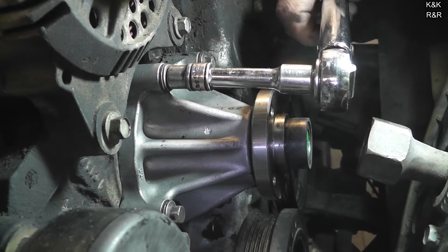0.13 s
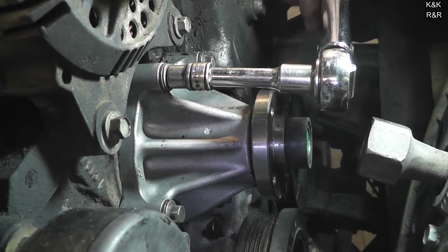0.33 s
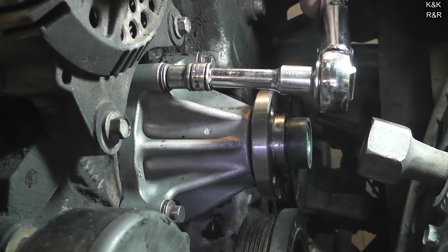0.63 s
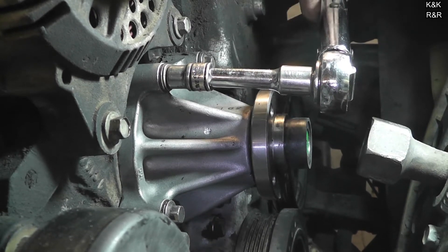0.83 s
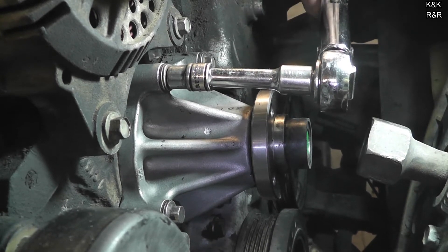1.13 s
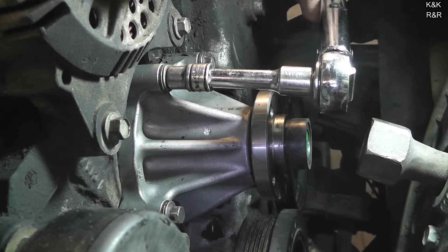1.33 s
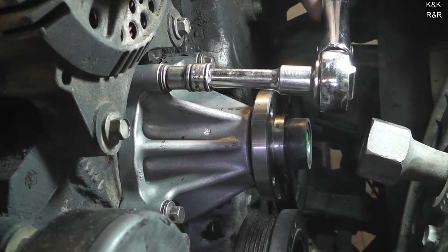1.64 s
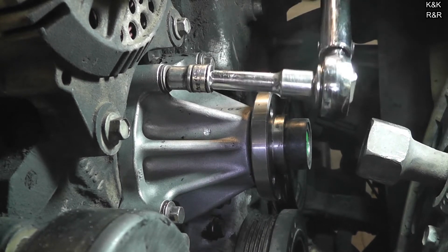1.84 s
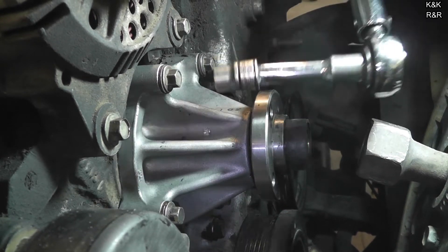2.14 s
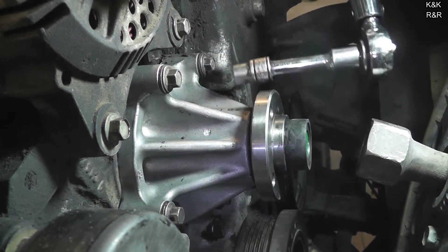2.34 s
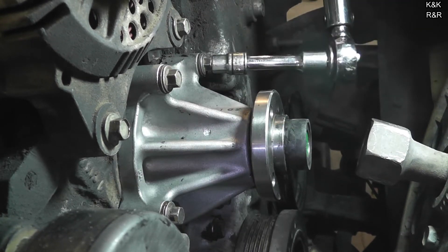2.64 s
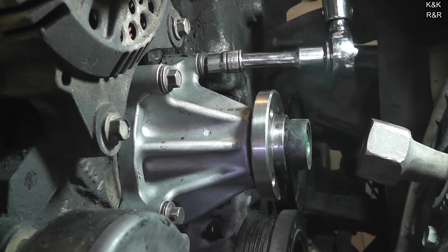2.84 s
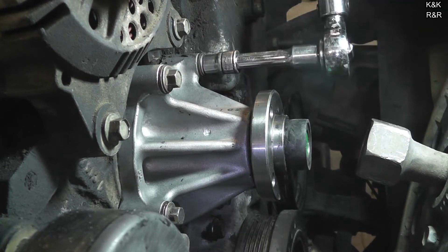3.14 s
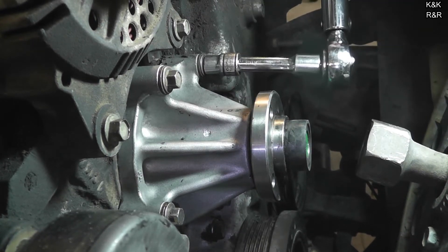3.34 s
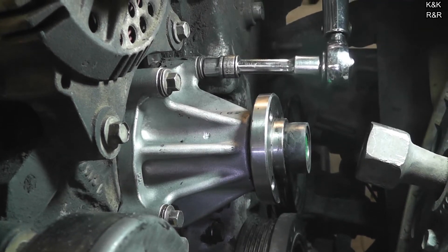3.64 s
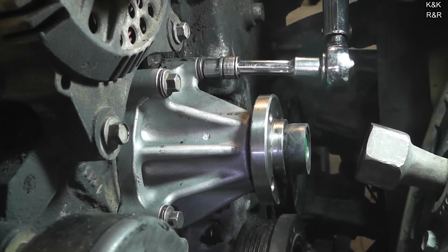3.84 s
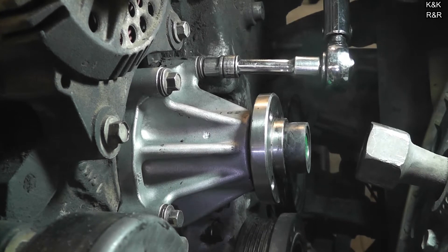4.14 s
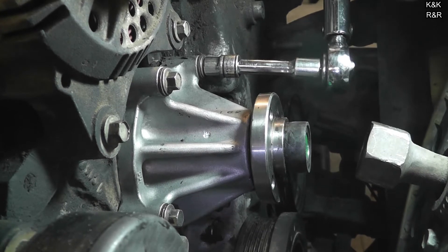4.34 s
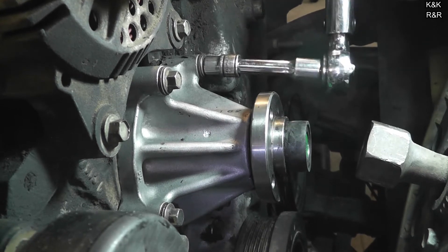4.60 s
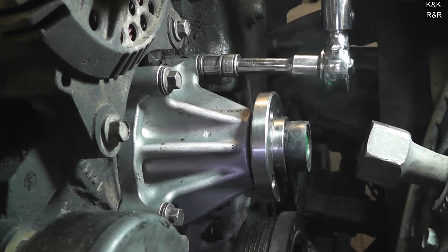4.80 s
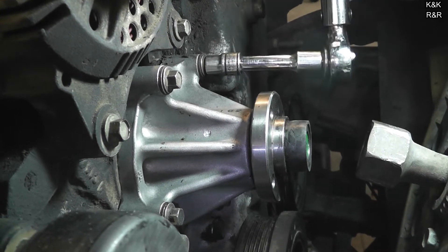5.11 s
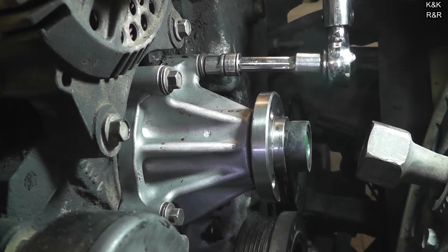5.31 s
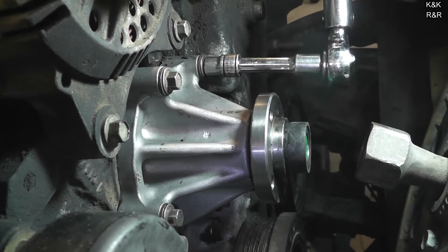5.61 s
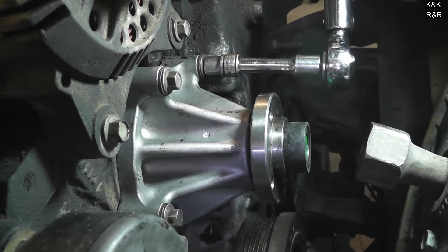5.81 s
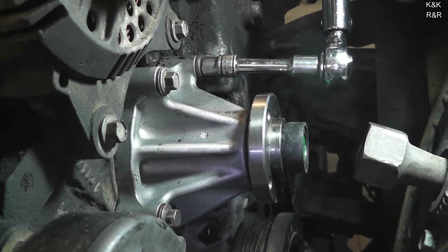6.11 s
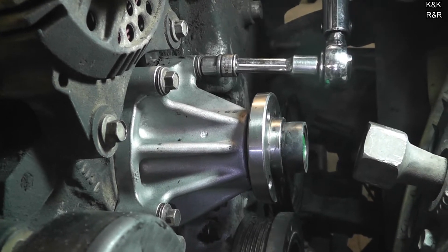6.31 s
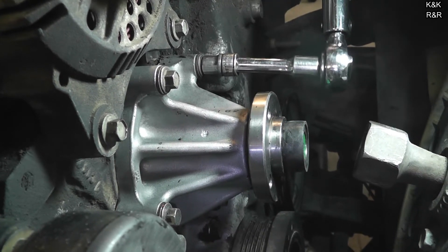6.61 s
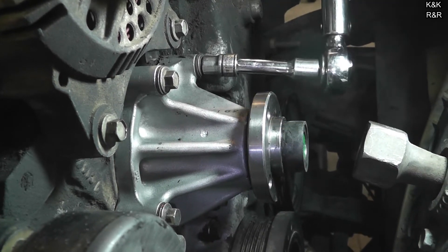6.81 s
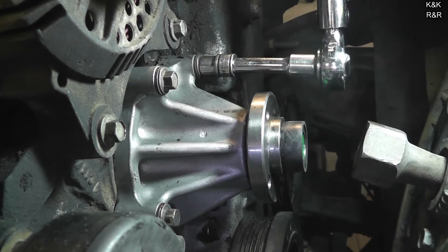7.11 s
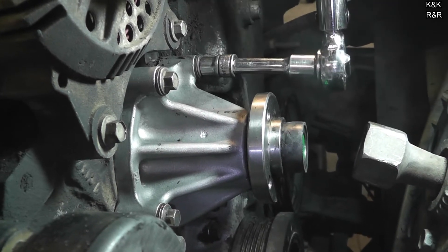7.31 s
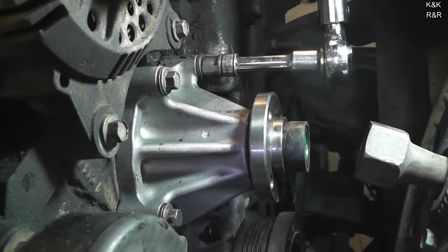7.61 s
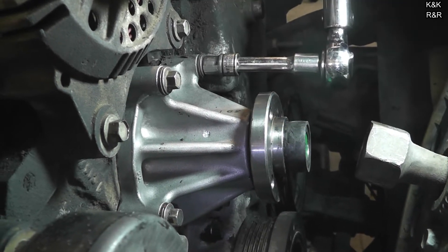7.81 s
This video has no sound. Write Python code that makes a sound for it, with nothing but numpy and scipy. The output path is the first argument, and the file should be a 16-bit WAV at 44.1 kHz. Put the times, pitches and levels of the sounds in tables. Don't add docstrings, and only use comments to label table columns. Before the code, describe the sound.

In a quiet garage, close to a stereo microphone, a socket wrench works on engine bolts. Dull hand bumps and light socket taps come first, then a crisp snap, a loud steel strike with a brief bright ring, and scattered clinks. After soft rustling and fumbling, hard ratchet clicks sound, then a heavy low clunk, two more sharp clicks and a final tap. Cloth rustle runs throughout.

```python
import sys
import numpy as np
from scipy import signal
from scipy.fft import rfft, irfft
from scipy.io import wavfile

SR = 44100
rng = np.random.default_rng(int(sys.argv[2]) if len(sys.argv) > 2 else 0)


def gain_from_db(level_db):
    decades = np.asarray(level_db, float) / 20
    return 10 ** decades


def to_wav(sig):
    pcm = np.clip(np.atleast_2d(sig), -1, 1) * 32767
    pcm = np.round(pcm).astype(np.int16)
    wavfile.write(sys.argv[1], SR, pcm.T)


N = 350595

# (frequency [Hz], density [dB per Hz])
AIR_SPECTRUM = [(20, -32.5), (120, 1.5), (200, -8), (280, -8.5), (800, -14), (1900, -30.5), (2400, -33.5),
                (3500, -34.5), (4200, -24.5), (5100, -30), (5500, -22), (6000, -30), (9000, -45.5),
                (15600, -52)]
# (frequency [Hz], level [dB rms])
WHINE_LINES = [(120, -67), (2000, -77.5)]
# (frequency [Hz], density [dB per Hz])
RUMBLE_SPECTRUM = [(120, -12), (270, 3), (500, -2.5), (900, -2), (1400, -8), (1900, -16), (2400, -38)]
# (frequency [Hz], density [dB per Hz])
SLEEVE_SPECTRUM = [(880, -17.5), (1500, -4.5), (1650, -12), (2070, -6), (2290, -14.5), (2730, -10),
                   (3520, -6), (4540, -2.5), (7120, -4), (8920, 0.5), (15600, -17)]
# (frequency [Hz], side minus mid [dB])
STEREO_SPREAD = [(60, 0.5), (110, -10), (200, -2.5), (380, -4.5), (700, -6.5), (1290, -6), (2380, -12),
                 (4400, -16), (8120, -21), (15000, 2.5)]
# (peak time [s], rise [s per 10 dB], fall [s per 10 dB], sleeve hiss [dB], hand rumble [dB])
ARM_SWEEPS = [(.25, 0.24, 0.02, -53.5, -54), (.52, 0.4, 0.01, -57.5, -51), (1.03, 0.07, 0.01, -56.5, -55),
              (1.88, 0.15, 0.18, -53, -51.5), (2.155, 0.09, 0.21, -55.5, -48),
              (2.918, 0.02, 0.85, -61, -54), (4.462, 0.29, 0.2, -55, -57), (5.01, 0.05, 0.08, -49, -44),
              (5.579, 0.02, 0.37, -58, -51), (6.148, 0.06, 0.2, -51, -51.5),
              (6.49, 0.0737, 0.0557, -47, -38), (6.64, 0.13, 0.1, -54.5, -50),
              (6.85, 0.12, 0.01, -54.5, -48.5), (7.427, 0.1, 0.07, -51, -45)]
# (start time [s], hold [s], sleeve hiss [dB], hand rumble [dB])
QUICK_BRUSHES = [(0, 0.085, -65.5, -56), (0.684, 0.055, -64, -56), (1.222, 0.024, -59, -59),
                 (1.446, 0.056, -61, -50), (1.513, 0.084, -67, -64), (2.308, 0.093, -68, -58.5),
                 (2.701, 0.015, -59.5, -50), (3.172, 0.23, -53, -51.5), (3.5, 0.032, -59, -51.5),
                 (3.626, 0.041, -55, -56.5), (3.748, 0.079, -54, -46.5), (3.93, 0.037, -54.5, -46.5),
                 (4.05, 0.014, -54.5, -54), (4.214, 0.025, -57.5, -46), (4.702, 0.059, -55.5, -77),
                 (5.178, 0.029, -58, -54), (5.27, 0.065, -57.5, -56), (5.398, 0.048, -59.5, -56),
                 (5.748, 0.058, -54.5, -57), (5.907, 0.012, -52, -51), (6.576, 0.078, -59, -50),
                 (6.902, 0.041, -58, -51.5), (6.978, 0.059, -62, -54.5), (7.084, 0.16, -58.5, -55.5),
                 (7.332, 0.012, -53.5, -52), (7.585, 0.06, -63.5, -52.5), (7.705, 0.025, -57, -54),
                 (7.785, 0.15, -65, -51)]

# (frequency [Hz], width [Hz], level [dB])
BRACKET_MODES = [(77.6, 13, -8), (159.3, 7, 2.5), (185, 8, 2.5), (259, 12, 4), (277, 5, 5), (291, 12, 4),
                 (341, 35, 3.5), (434, 29, 7), (480, 53, 4.5), (660, 36, 0.5), (850, 84, -4.5),
                 (1210, 46, -2.5), (1340, 58, -1.5), (1640, 46, -12)]
# (time [s], peak [dB], main frequency [Hz], t60
# [s])
SOFT_KNOCKS = [(0.677, -31.5, 806, 0.041), (0.974, -32.5, 770, 0.18), (1.244, -47, 760, 0.068),
               (1.2655, -34.5, 790, 0.1), (1.42, -43, 1500, .03), (1.433, -31.5, 740, 0.062),
               (2.135, -36, 603, 0.08), (2.15, -34.5, 1040, 0.091), (2.167, -37, 503, .06),
               (2.516, -35, 1460, 0.062), (2.698, -43, 1270, .04), (2.915, -41, 850, 0.052),
               (2.972, -40.5, 1300, 0.033), (6.602, -31.5, 195, 0.26), (4.636, -41, 1300, .04),
               (4.87, -45, 1190, .053), (4.959, -43.5, 1230, 0.028), (4.981, -33.5, 1100, 0.031),
               (4.998, -39, 1210, 0.037), (5.918, -36, 1360, 0.049), (6.078, -34.5, 960, 0.064),
               (6.426, -35, 1000, .03), (6.431, -30, 527, 0.074), (6.599, -24.5, 630, 0.051),
               (6.648, -35, 541, 0.15), (7.537, -41, 750, 0.024), (7.606, -41.5, 740, .03),
               (7.628, -48, 1100, .025), (7.648, -36, 740, 0.047), (7.744, -38, 700, .025),
               (7.758, -36.5, 810, 0.035), (7.79, -32.5, 815, 0.02), (7.874, -28, 780, 0.063),
               (0.078, -29.5, 448, 0.14), (0.469, -39, 322, 0.075), (0.938, -32.5, 450, 0.17),
                (0.984, -27.5, 195, 0.07), (1.009, -33, 420, 0.031), (1.433, -33, 480, 0.045),
                (1.504, -39.5, 264, 0.096), (2.087, -42, 204, .06), (2.149, -37.5, 152, 0.09),
                (2.334, -40, 174, 0.04), (6.432, -35, 224, 0.063), (3.791, -37, 288, 0.038),
                (3.863, -37, 287, 0.074), (3.984, -39.5, 150, 0.049), (4.162, -40, 165, 0.058),
                (4.215, -33, 263, 0.04), (4.263, -36.5, 274, 0.059), (4.324, -37, 160, .039),
                (4.392, -36, 370, 0.039), (4.481, -36.5, 328, 0.078), (6.478, -44, 277, .11),
                (6.537, -24.5, 298, 0.053), (6.578, -34, 250, 0.054), (7.393, -46, 164, .062),
                (7.916, -30.5, 586, 0.082), (7.922, -28.5, 435, 0.061), (7.938, -33.5, 480, .06)]
# (frequency [Hz], width [Hz], level [dB])
CASTING_MODES = [(168, 16, 0.5), (276, 15, 5.5), (356, 7.1, -18), (446.5, 27, 1.5), (653, 19, -9),
                 (857, 5.7, 3.5), (1210, 8.9, -10), (1424, 14, -7.5), (1680, 88, -13.5)]

# (frequency [Hz], level [dB], t60 [s])
BOLT_MODES = [(756, -1, .1), (820, -2.5, 0.13), (1863, -8.5, 0.078)]
# (time [s], peak [dB])
BOLT_HUM_EVENTS = [
    (.679, -41),
    (.976, -39),
    (1.245, -45.5),
    (1.267, -41),
    (1.434, -36.5),
]
# (frequency [Hz], peak [dB], t60 [s], left minus right [dB], left lead [rad])
FREE_SOCKET_MODES = [(1520, -41, .14, -2, 1), (8974, -43.5, .15, -8, 0), (12090, -28.5, .17, -2, 2.5),
                     (12870, -25.5, .16, -4, .7)]

# (time [s], left level [dB], right lag [ms], right level [dB])
OVERLOAD_KICKS = [
    (1.9095, -23.5, -.4, -30.5),
    (2.1893, -8.5, 1.2, -12),
    (4.5654, -12, -.3, -24),
    (4.5672, -16, .1, -10),
    (4.6622, -11.5, 1.1, -18.5),
    (4.7542, -13.5, 0, -12),
    (7.0487, -12, -.4, -10.5),
    (7.1837, -12, .2, -13),
]

SEAT_HITS = [
    (0.0794, -71.5, 13, -6),
    (0.6784, -57, 6.5, -22),
    (1.2443, -62.5, 7.5, -18),
    (1.2666, -54, 5, -29),
    (4.2333, -57, -4, -22),
    (4.8728, -66.5, 3, -18),
    (4.9823, -56, 0.5, -15),
    (5.919, -58, 4.5, -5),
    (6.0806, -63.5, 8, -17),
    (6.5989, -63, 12, -10),
]
SEAT_MODES = [(1850, 150, 2), (2550, 58, 2.5), (2870, 110, -4), (3700, 260, 4.5), (5260, 190, 3.5),
              (6900, 200, -1), (8230, 310, 1), (9650, 400, -5), (11000, 210, -26), (14200, 310, -37)]
BOLT_TAPS = [
    (0.9762, -41.5, 2.5, -30),
    (1.4331, -33.5, -2, -26),
    (6.4802, -42, 1, -19),
    (6.5062, -43, 9, -9),
]
BOLT_TAP_MODES = [(1810, 120, -9), (2800, 88, -7), (3080, 110, -10), (3750, 210, -1.5), (4030, 110, -1.5),
                  (4520, 120, -1.5), (5570, 87, -10), (6340, 340, -9), (8190, 240, 3), (8300, 144, 4.5),
                  (8770, 300, -0.5), (10200, 460, -7), (12400, 600, -24)]
RIM_HITS = [
    (7.8752, -40.5, 4.1, -21),
]
RIM_MODES = [(2050, 140, -7), (3280, 270, 0.5), (3870, 220, -1), (4240, 250, 5.5), (4900, 350, -0.5),
             (5200, 230, -2), (6600, 450, -12), (8300, 350, 1), (9300, 600, -13), (10700, 550, -19),
             (12600, 500, -18)]
HOUSING_CLINKS = [
    (2.5099, -38.5, -5.5, -14),
    (2.5166, -38, -2.5, -10),
    (2.6988, -44.5, -2.5, -8),
    (2.9181, -41, -3, -18),
    (2.972, -55.5, -6, -20),
]
HOUSING_CLINK_MODES = [(1300, 250, -8), (1810, 260, -3.5), (3000, 350, -9), (4080, 320, -1),
                       (4650, 430, -5), (5600, 220, -2), (6460, 500, -2), (7300, 500, -1.5),
                       (8000, 590, -2), (9950, 420, 1.5), (10500, 400, -3.5), (11200, 400, -5),
                       (14100, 900, -14)]
LIFTED_HITS = [
    (2.1871, -24, -7, -9.5),
]
LIFTED_MODES = [(1530, 140, -6), (3950, 250, -4.5), (4450, 250, -5), (4950, 250, 2.5), (5640, 200, -8),
                (6120, 300, -3), (7000, 450, -0.5), (7600, 300, -2.5), (9700, 530, -1.5), (10100, 200, -6),
                (10700, 350, -2.5), (14000, 500, -11)]
HEAD_SNAPS = [(1.7824, -46, -12, -4.5), (1.8925, -38, -13.5, -46), (1.9045, -41.5, -23, -4),
              (1.9061, -32, -24, 0), (1.9104, -34, -21, -14), (1.9107, -36, -21, -15),
              (3.6376, -56, -19, -10), (3.939, -60.5, 1, -23), (4.0741, -52.5, -25, -1),
              (4.4582, -51.5, -13, -14), (4.741, -56, -10, -14), (6.695, -45.5, -15, -22),
              (6.855, -59.5, -6, -17)]
HEAD_MODES = [(3200, 350, -21.5), (4500, 390, -24), (5550, 300, -15), (6540, 300, -7), (7200, 350, -8.5),
              (8400, 300, -9), (8910, 150, -2), (9500, 200, 0.5), (10160, 300, -4.5), (10770, 250, -7),
              (11430, 300, -7.5), (12760, 400, -12), (13800, 800, -21)]
SLACK_DROPS = [
    (4.5636, -23, -16.5, -12),
    (4.6599, -25, -17.5, -13),
]
SLACK_MODES = [(750, 300, -11.5), (1380, 300, -17), (3310, 280, -15.5), (4210, 130, -10), (4970, 300, -14),
               (5830, 250, -9), (6420, 270, -7.5), (6960, 187, -13), (7970, 280, -7), (8530, 460, -17.5),
               (10020, 350, 1), (10720, 250, -7.5), (11950, 340, -13), (14400, 900, -19.5)]
LOADED_DROPS = [
    (4.7519, -26, -13, -12),
    (7.045, -24, -17.5, -10),
]
LOADED_MODES = [(750, 380, -15), (1990, 250, -26), (3150, 270, -14), (4300, 630, -13), (5170, 300, -15.5),
                (6240, 250, -7.5), (6750, 280, -1.5), (7470, 180, -11.5), (8350, 300, -6),
                (9730, 260, -6.5), (10550, 300, -2), (11100, 260, -8), (12000, 400, -12),
                (14000, 1200, -16.5)]
BINDING_DROP = [
    (7.1806, -25.5, -13, -9),
]
BINDING_MODES = [(900, 500, -20.5), (1500, 270, -21), (3180, 240, -13.5), (4200, 400, -12),
                 (5060, 300, -21), (6320, 300, -10), (6860, 300, -9), (7560, 300, -13.5), (8400, 300, -10),
                 (9650, 250, -9), (10350, 280, 0), (10950, 250, -3), (12400, 600, -18), (14000, 1200, -19)]

AIR_DB, REST_SLEEVE_DB, REST_HAND_DB = -56.5, -72, -61
RUMBLE_CUT_HZ, HISS_TOP_HZ = 37, 15750
BRUSH_RISE_S, BRUSH_FALL_S = 0.019, 0.029
FOLD_DB, FOLD_LOW_HZ, FOLD_HIGH_HZ = 1.5, 6200, 10200
DUCK_ABOVE_DB, DUCK_DB = -30, 4
DUCK_ATTACK_S, DUCK_RELEASE_S = 0.03, 0.24
CLUNK_S, CLUNK_DB = 6.5055, -10.5
CENTRE_HZ, PAN_DB_PER_OCTAVE = 700, 3
BLOW_S = 0.84
CLINK_S = 2.188
WIDEN = 0.62
TAIL_SHRINK_PER_DB = 0.0736


def rms_one(x):
    return x / np.sqrt(np.mean(x ** 2) + 1e-20)


def at_hz(points, hz):
    point_hz, point_db = np.array(points)[:, 0], np.array(points)[:, 1]
    return np.interp(np.log(hz + 1), np.log(point_hz + 1), point_db)


def band(x, low_hz, high_hz, order=2):
    return signal.sosfilt(signal.butter(order, [low_hz, high_hz], "band", fs=SR, output="sos"), x)


def resonate(x, peaks, order=1):
    out = 0
    for k, (hz, width, db) in enumerate(peaks):
        r = np.exp(-np.pi * width * order / SR)
        zeros = [(1 - r * r) / 2, 0, (r * r - 1) / 2]
        poles = [1, -2 * r * np.cos(2 * np.pi * hz / SR), r * r]
        out = out + (-1) ** k * gain_from_db(db) * signal.sosfilt([zeros + poles] * order, x)
    return out


def to_stereo(mid, side):
    hz = np.fft.rfftfreq(side.shape[-1], 1 / SR)
    side = irfft(rfft(side) * gain_from_db(at_hz(STEREO_SPREAD, hz)), side.shape[-1])
    return np.array([mid + side, mid - side])


def add(out, s, piece):
    i = int(s * SR)
    out[:, i:i + piece.shape[1]] += piece[:, :N - i]


def drift(rate_hz):
    r = np.exp(-2 * np.pi * rate_hz / SR)
    wander = signal.lfilter([1], [1, -2 * r, r * r], rng.standard_normal(N + SR))
    return rms_one(wander[SR:])


def coloured(spectrum, grain_db):
    hz = np.fft.rfftfreq(N, 1 / SR)
    white = rng.standard_normal((2, N)) * gain_from_db(grain_db * rng.exponential(1, (2, N)))
    mid, side = irfft(rfft(white) * gain_from_db(at_hz(spectrum, hz)) * (hz < HISS_TOP_HZ), N)
    return to_stereo(mid, side) / np.std(mid)


def garage_air():
    t = np.arange(N) / SR
    lines = 0
    for hz, db in WHINE_LINES:
        lines = lines + gain_from_db(db + 55.5) * np.sin(2 * np.pi * hz * t + 0.63 * drift(3.2))
    return gain_from_db(AIR_DB) * (band(coloured(AIR_SPECTRUM, grain_db=1.0), RUMBLE_CUT_HZ, 20000) + lines)


def movements():
    t = np.arange(0, N, 32) / SR
    power = gain_from_db([[2 * REST_SLEEVE_DB], [2 * REST_HAND_DB]])
    strokes = [(s, 0, *rest) for s, *rest in ARM_SWEEPS]
    strokes += [(s, hold, BRUSH_RISE_S, BRUSH_FALL_S, *levels) for s, hold, *levels in QUICK_BRUSHES]
    for s, hold, rise, fall, *levels in strokes:
        distance = np.maximum((s - t) / rise, (t - s - hold) / fall)
        loss_db = 10 * np.maximum(distance, 0) ** 1.17
        power = power + gain_from_db(np.c_[levels] - loss_db) ** 2
    return [np.interp(np.arange(N) / SR, t, np.sqrt(p)) for p in power]


def hand_rumble(level):
    return level * gain_from_db(-4.5 + 2 * drift(13.0)) * coloured(RUMBLE_SPECTRUM, grain_db=2)


def folds(x):
    low, high = band(x, 300, FOLD_LOW_HZ), band(x, FOLD_HIGH_HZ, 18000)
    return sum(gain_from_db(FOLD_DB * drift(3.7)) * part for part in (low, x - low - high, high))


def sleeve_rustle(level):
    flicker_db = 1.4 * drift(35) + 1.6 * drift(8.2)
    return level * gain_from_db(flicker_db) * folds(coloured(SLEEVE_SPECTRUM, grain_db=2.5))


def ducking():
    teeth = SLACK_DROPS + LOADED_DROPS + BINDING_DROP
    loud_s = [s for s, db, *_ in teeth if db > DUCK_ABOVE_DB]
    after = np.maximum(np.arange(N) / SR - np.c_[loud_s], 0)
    dips = (1 - np.exp(-after / DUCK_ATTACK_S)) * np.exp(-after / DUCK_RELEASE_S)
    return gain_from_db(-DUCK_DB * np.sum(dips, axis=0))


def background():
    sleeve_level, hand_level = movements()
    return ducking() * (garage_air() + hand_rumble(hand_level) + sleeve_rustle(sleeve_level))


def handle_clunk(press_ms, wide):
    out, t = np.zeros((2, N)), np.arange(SR // 2) / SR
    press = np.minimum(t / 0.00079, 1) * np.exp(-(t * 1000 / press_ms) ** 3)
    grind = press * rng.standard_normal((2, len(t)))
    grind[:, 40] += 11.0
    mid, side = band(resonate(grind, BRACKET_MODES), 50, 2900, order=3)
    pair = np.array([0.82 * mid + wide * side, 1.15 * mid - wide * side])
    add(out, CLUNK_S, gain_from_db(CLUNK_DB) / np.abs(mid).max() * pair)
    return out


def knocks():
    out, t = np.zeros((2, N)), np.arange(12000) / SR
    for s, db, hz, t60 in SOFT_KNOCKS:
        noise = rng.standard_normal((2, len(t)))
        noise[0, 50] += BLOW_S / t60
        fade = np.minimum(t / 0.0013, 1) * gain_from_db(-60 * t / t60)
        push = resonate(noise * fade, [(hz, 0.95 * hz, 0)])
        rung = resonate(push, [(hz, 0.15 * hz, -1)])
        rung = rung + gain_from_db(-1.0) * resonate(push, CASTING_MODES) + gain_from_db(-4.0) * band(push, 130, 2100)
        rung = band(rung, 0.28 * hz, 1.94 * hz + 350, order=3)
        mid, side = gain_from_db(db) * rung / np.abs(rung[0]).max()
        pan_db = PAN_DB_PER_OCTAVE * np.log2(hz / CENTRE_HZ)
        add(out, s, np.array([mid + 0.39 * side, mid - 0.16 * side]) * gain_from_db([[pan_db / 2], [-pan_db / 2]]))
    return out


def bolt_hum():
    out, t = np.zeros((2, N)), np.arange(SR // 2) / SR
    for s, db in BOLT_HUM_EVENTS:
        for hz, mode_db, t60 in BOLT_MODES:
            fade = gain_from_db(db + mode_db - BOLT_MODES[0][1] - 60 * t / t60) * np.minimum(t / 0.0013, 1)
            tone = np.sin(2 * np.pi * (hz * t + rng.random()))
            add(out, s, np.tile(fade * tone, (2, 1)))
    return out


def free_socket_ring():
    out, t = np.zeros((2, N)), np.arange(SR // 2) / SR
    for hz, db, t60, pan_db, lead in FREE_SOCKET_MODES:
        phase = 2 * np.pi * (hz * t + rng.random()) + np.array([[lead], [0]])
        fade = gain_from_db(db - 60 * t / t60) * np.minimum(t / 0.002, 1)
        add(out, CLINK_S, gain_from_db([[pan_db / 2], [-pan_db / 2]]) * fade * np.sin(phase))
    return out


def overload_thumps(sag_ms, block_hz):
    kick = np.zeros((2, N))
    for s, left_db, lag_ms, right_db in OVERLOAD_KICKS:
        start_s = s - 0.0009
        kick[0, int(start_s * SR)] = -gain_from_db(left_db)
        kick[1, int((start_s + lag_ms / 1000) * SR)] = -gain_from_db(right_db)
    t_ms = np.arange(2000) / SR * 1000
    r = np.exp(-2 * np.pi * block_hz / SR)
    pulse = signal.lfilter([1, -1], [1, -r], t_ms * np.exp(-t_ms / sag_ms))
    left, right = signal.oaconvolve(kick, pulse[None] / pulse.max())[:, :N]
    return np.array([left - WIDEN * right, right - WIDEN * left])


def steel(events, ring, broad_db, tail_db, contact_ms, t60, impact):
    out, t = np.zeros((2, N)), np.arange(4500) / SR
    usual_db = np.mean(events, axis=0)[1]
    for s, db, body_db, edge_db in events:
        noise = rng.standard_normal((2, len(t)))
        contact = np.minimum(t / 0.00067, 1) * np.exp(-(t * 1000 / contact_ms) ** 2)
        contact[20] *= impact
        noise[0, 20] = 1
        decay_s = t60 * np.exp(-TAIL_SHRINK_PER_DB * (db - usual_db))
        tail = np.minimum(t / 0.0039, 1) * gain_from_db(tail_db - 60 * t / decay_s)
        struck = resonate(noise * (contact + tail), ring, order=2)
        struck = struck + gain_from_db(broad_db) * noise * (contact + 2.9 * tail)
        hit = 0
        for low, high, level in [(500, 5500, db + body_db), (5500, 11200, db), (11200, 16500, db + edge_db)]:
            zone = band(struck, low, high, order=4)
            hit = hit + gain_from_db(level) * zone / np.std(zone[0, :SR // 50])
        add(out, s, to_stereo(*hit))
    return out


def socket_on_bolt():
    seat = steel(SEAT_HITS, SEAT_MODES, broad_db=-9, tail_db=-5, contact_ms=0.78, t60=0.044, impact=11.4)
    tap = steel(BOLT_TAPS, BOLT_TAP_MODES, broad_db=-19.5, tail_db=-2, contact_ms=1.46, t60=0.051, impact=16.0)
    return seat + bolt_hum() + tap


def socket_on_housing():
    strike = steel(LIFTED_HITS, LIFTED_MODES, broad_db=-23.5, tail_db=-10.5, contact_ms=1.55, t60=0.051, impact=11.0)
    clinks = steel(HOUSING_CLINKS, HOUSING_CLINK_MODES, broad_db=-13.5, tail_db=-10.0, contact_ms=1.55,
                   t60=0.063, impact=7.6)
    rim = steel(RIM_HITS, RIM_MODES, broad_db=-20, tail_db=-1, contact_ms=1.2, t60=0.041, impact=13.0)
    return strike + free_socket_ring() + clinks + rim


def wrench_snaps():
    head = steel(HEAD_SNAPS, HEAD_MODES, broad_db=-13.5, tail_db=-8.5, contact_ms=1.7, t60=0.045, impact=9.0)
    slack = steel(SLACK_DROPS, SLACK_MODES, broad_db=-26, tail_db=-9, contact_ms=2.1, t60=0.037, impact=12.0)
    loaded = steel(LOADED_DROPS, LOADED_MODES, broad_db=-25.5, tail_db=-7.5, contact_ms=2.0, t60=0.039, impact=12.0)
    binding = steel(BINDING_DROP, BINDING_MODES, broad_db=-27.5, tail_db=-6.5, contact_ms=2.1, t60=0.04, impact=11.4)
    return head + slack + loaded + binding


def scene():
    mix = background() + handle_clunk(press_ms=15.2, wide=0.45) + knocks()
    mix = mix + socket_on_bolt() + socket_on_housing()
    return mix + overload_thumps(sag_ms=1.0, block_hz=69.7) + wrench_snaps()


def top_cut(x):
    return signal.sosfilt(signal.butter(12, 16810, fs=SR, output="sos"), x)


def record(dry):
    shaded = dry - resonate(dry, [(3506, 180, -2)])
    rolled = signal.sosfilt(signal.cheby2(10, 60, 16800, fs=SR, output="sos"), shaded)
    return top_cut(rolled)


dry = scene()
out = record(dry)
to_wav(out)
```